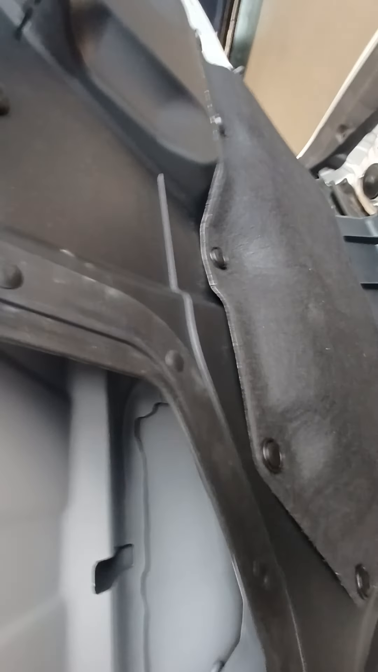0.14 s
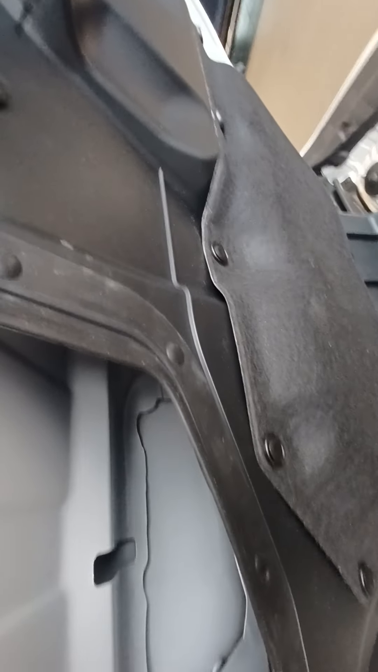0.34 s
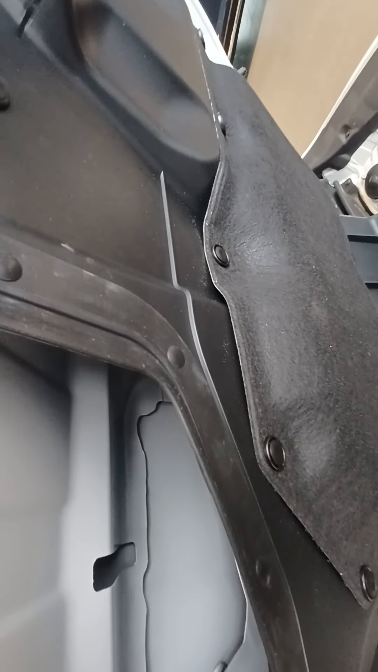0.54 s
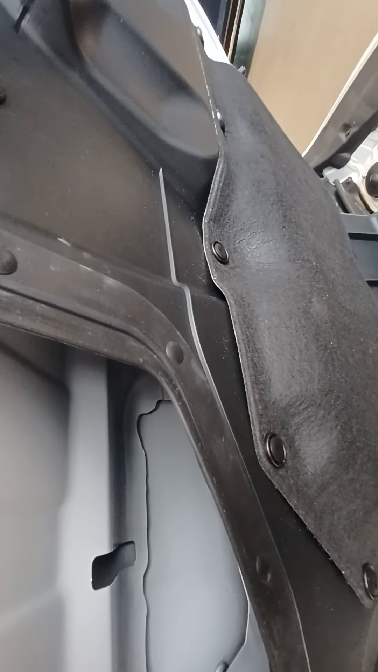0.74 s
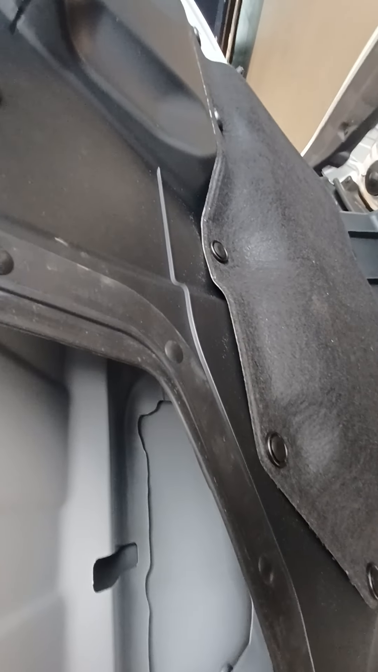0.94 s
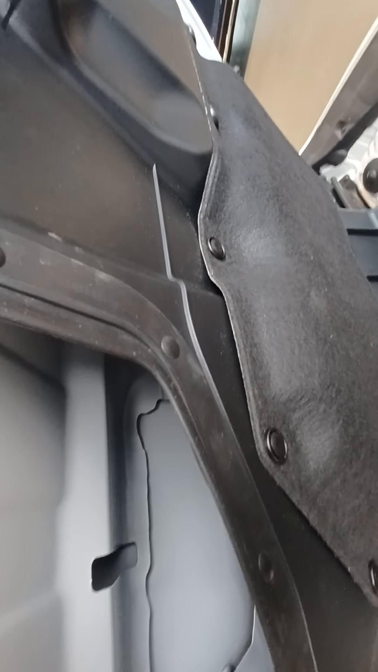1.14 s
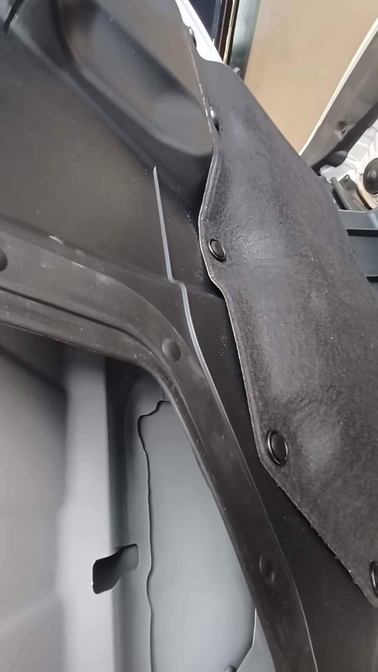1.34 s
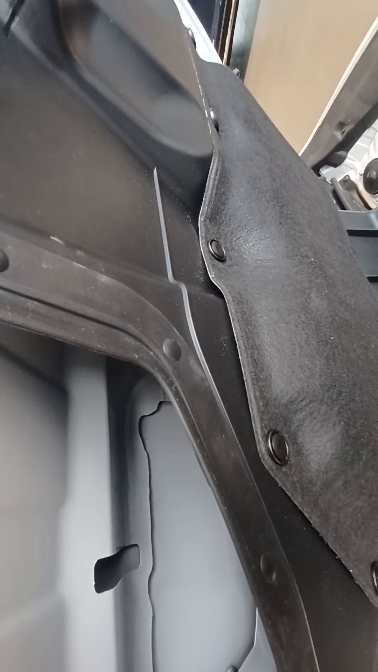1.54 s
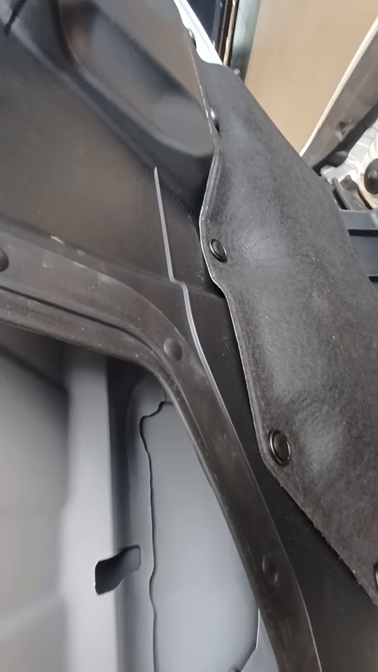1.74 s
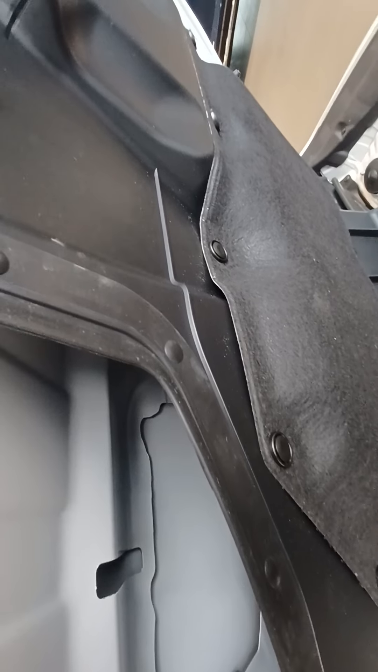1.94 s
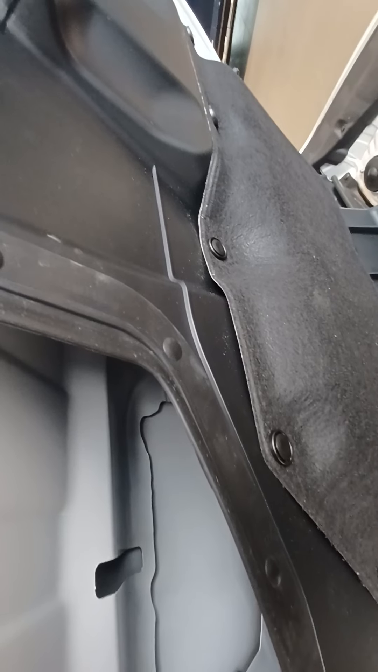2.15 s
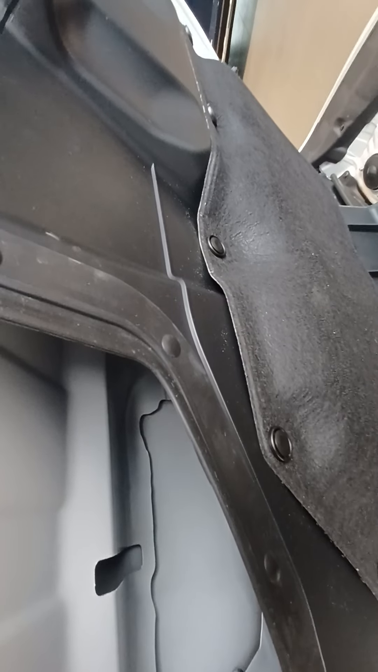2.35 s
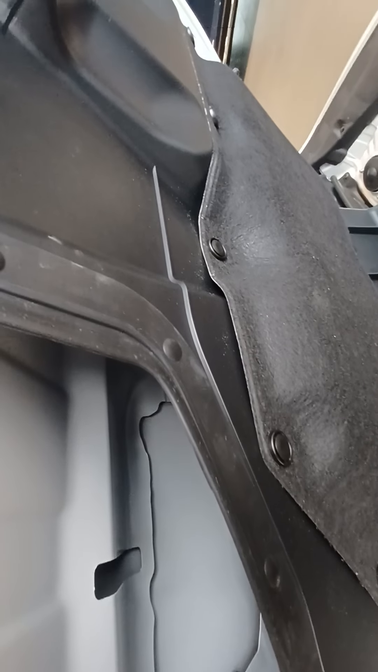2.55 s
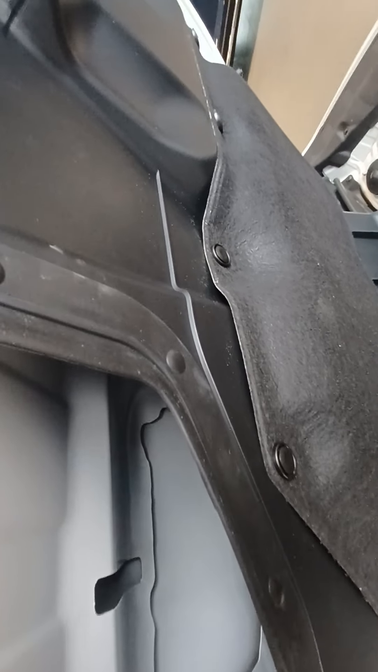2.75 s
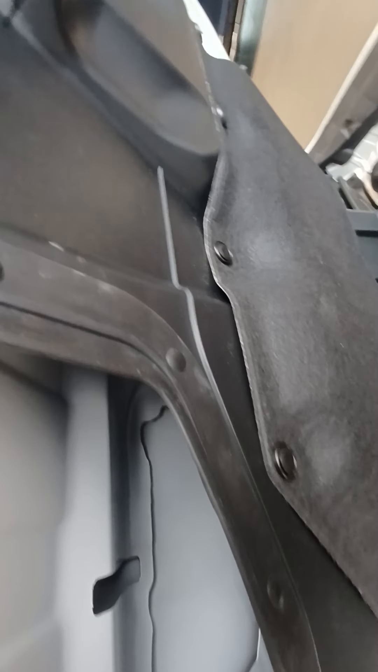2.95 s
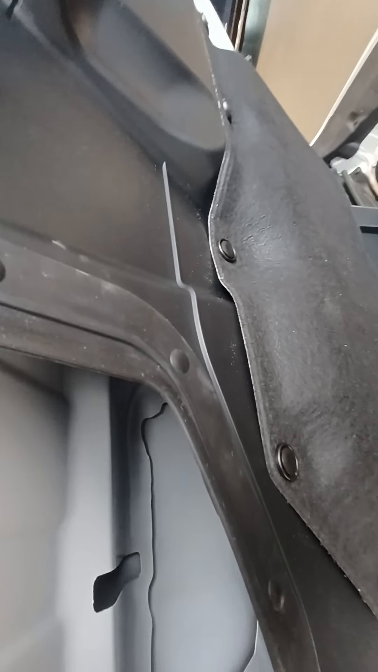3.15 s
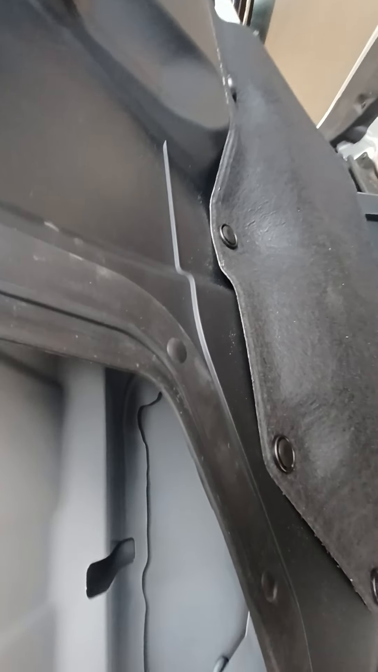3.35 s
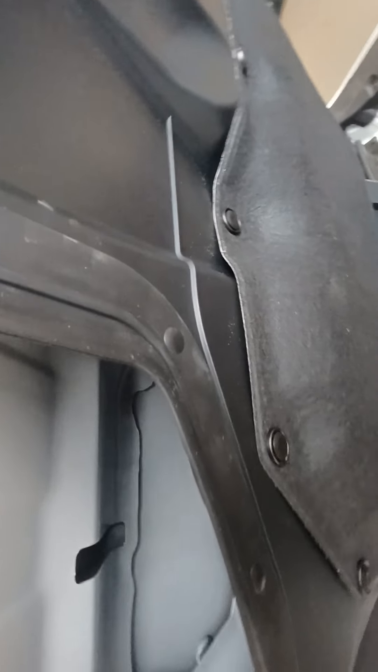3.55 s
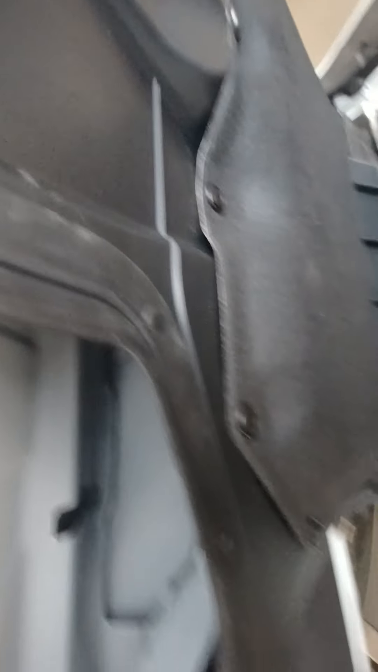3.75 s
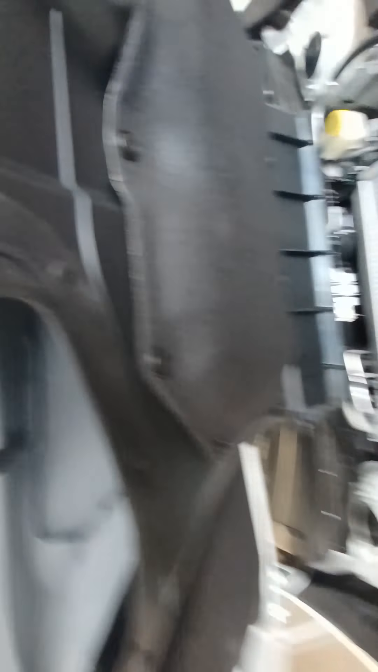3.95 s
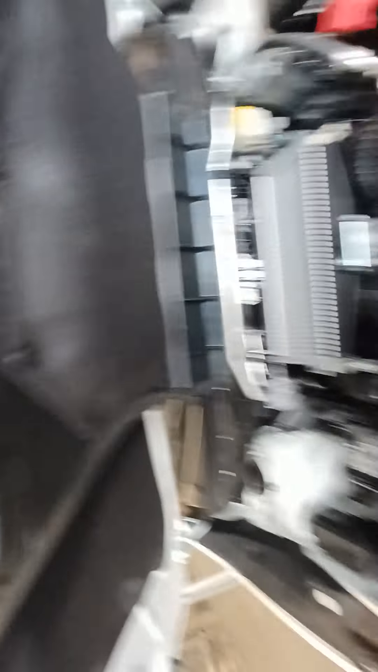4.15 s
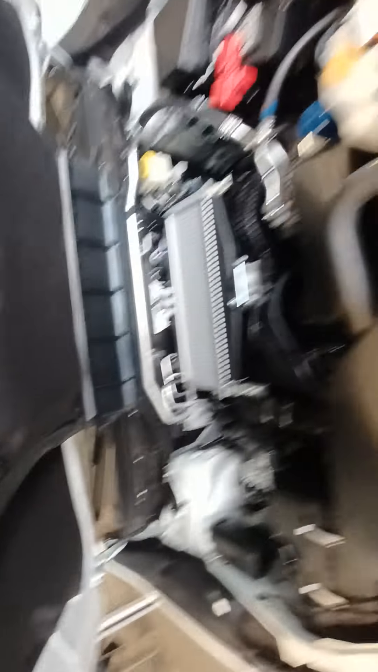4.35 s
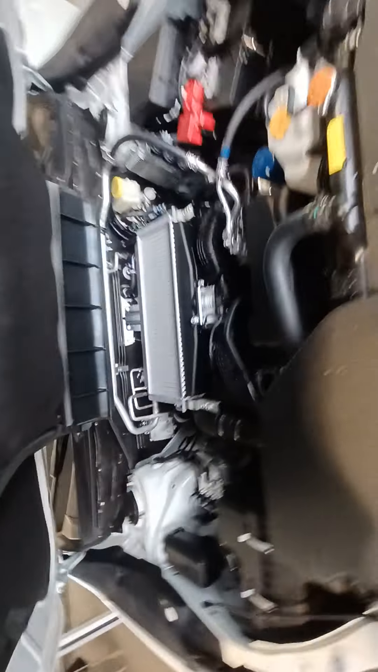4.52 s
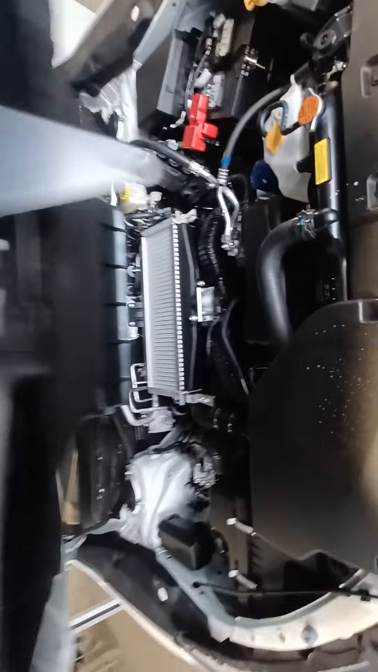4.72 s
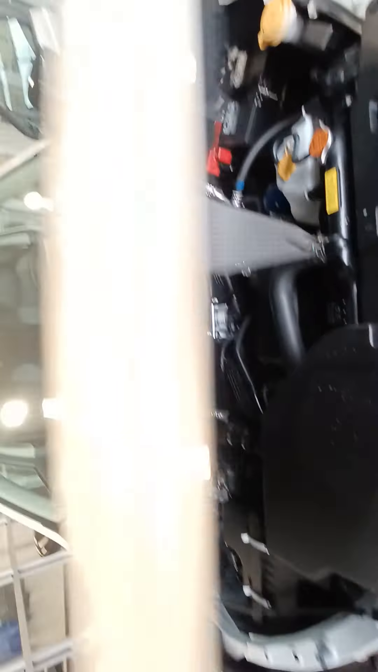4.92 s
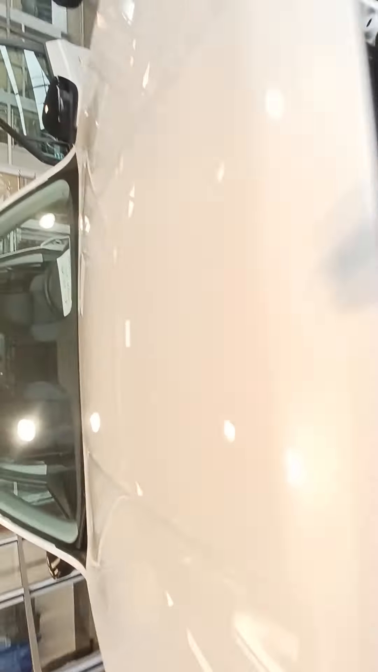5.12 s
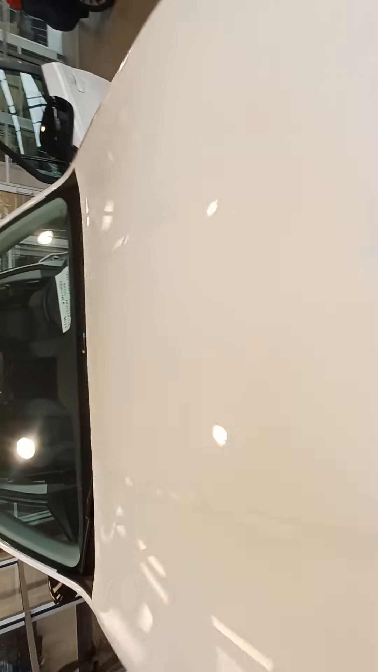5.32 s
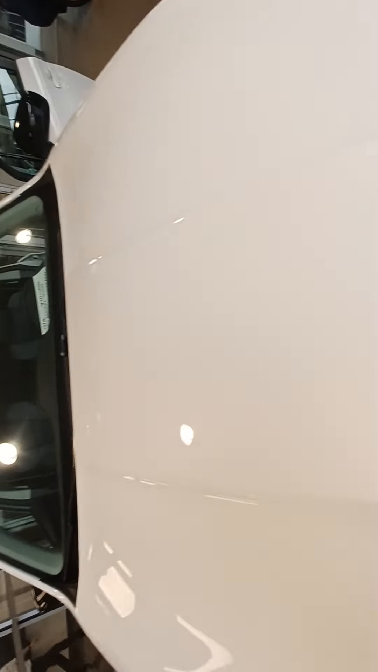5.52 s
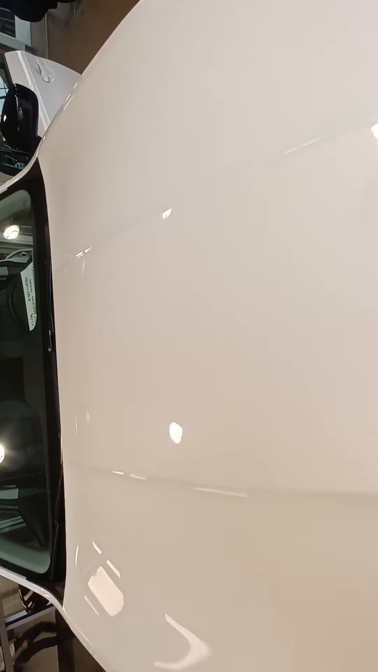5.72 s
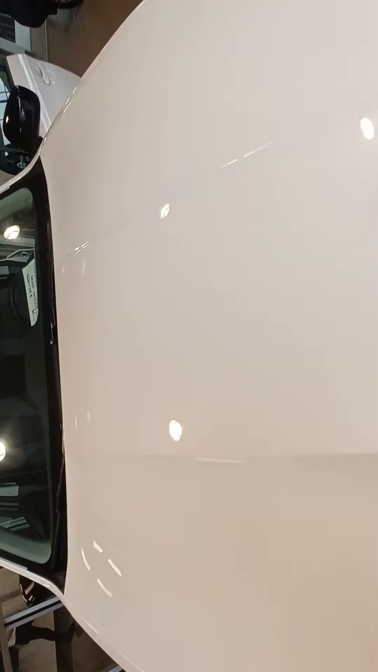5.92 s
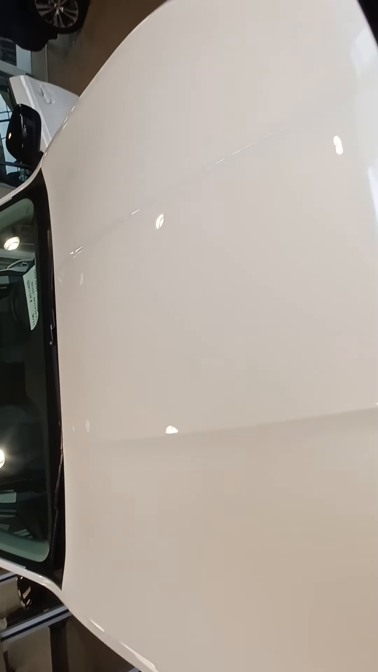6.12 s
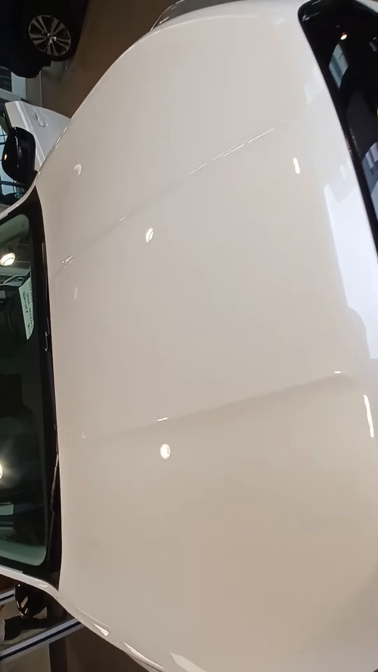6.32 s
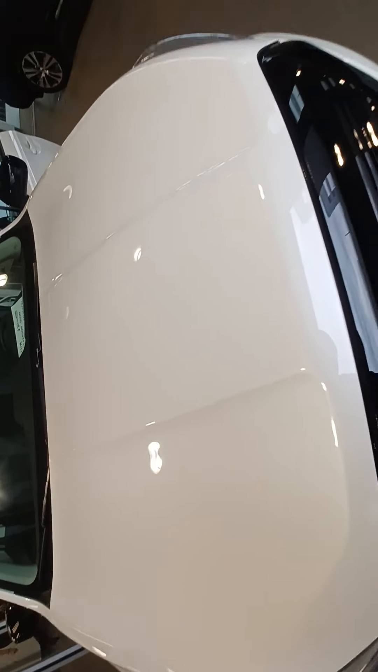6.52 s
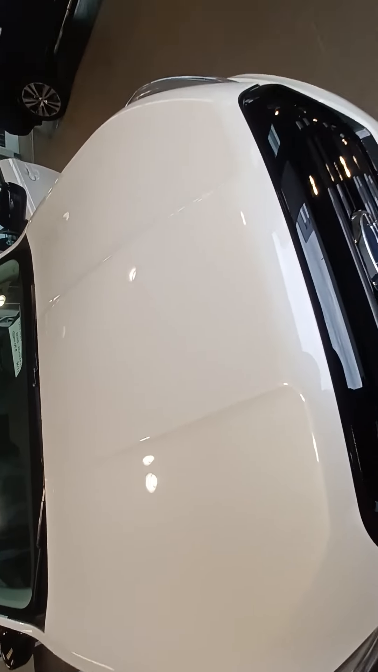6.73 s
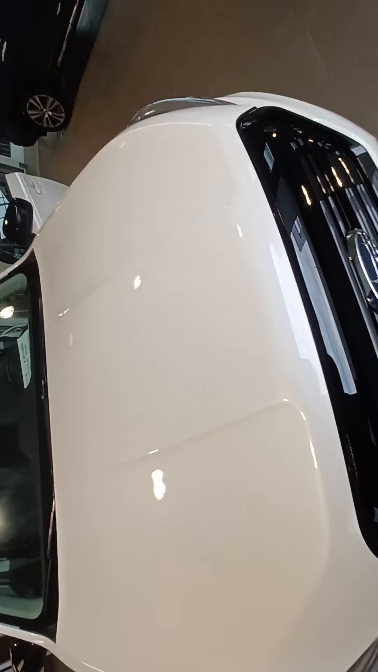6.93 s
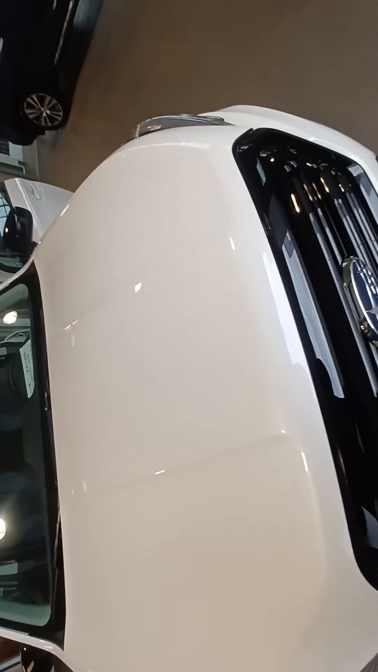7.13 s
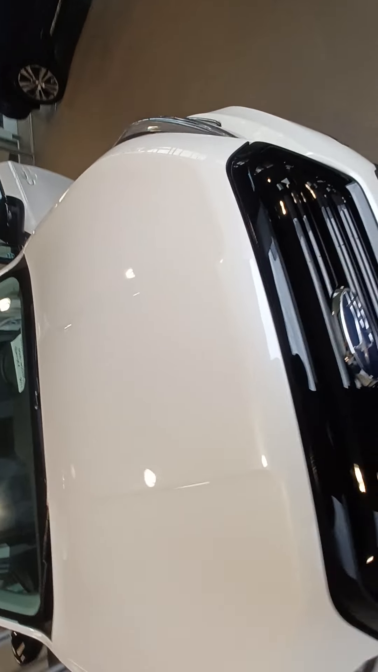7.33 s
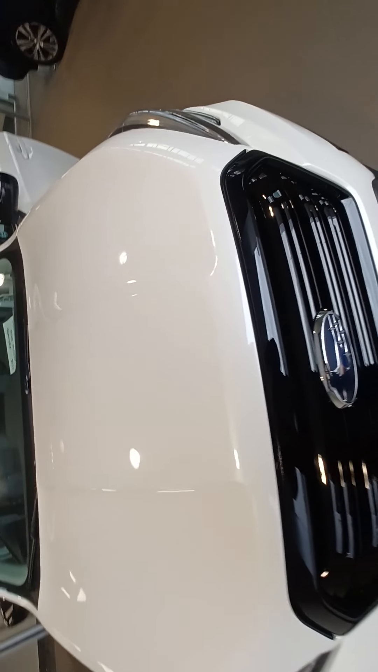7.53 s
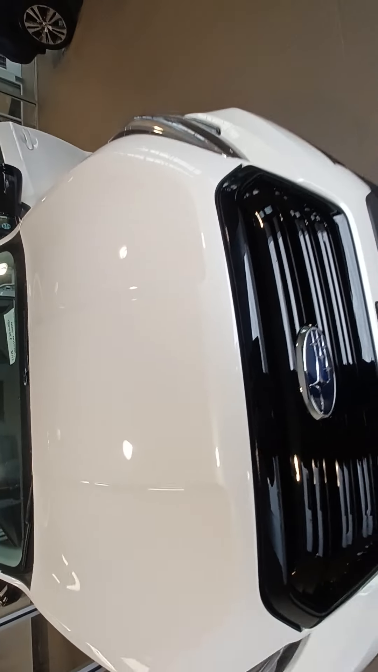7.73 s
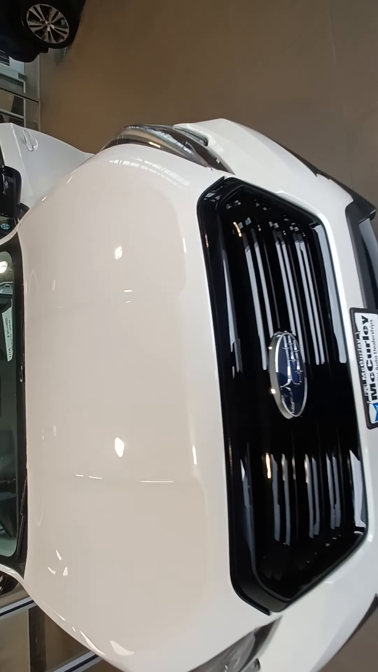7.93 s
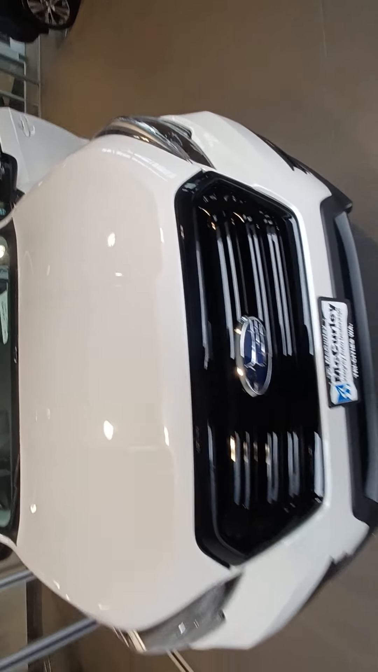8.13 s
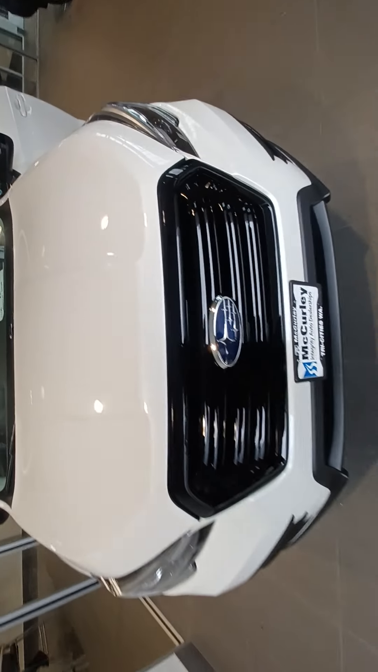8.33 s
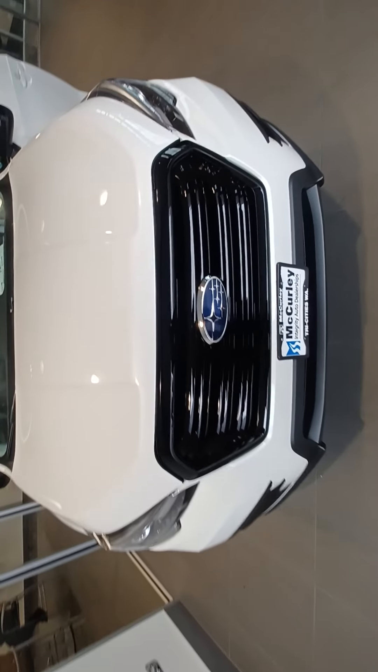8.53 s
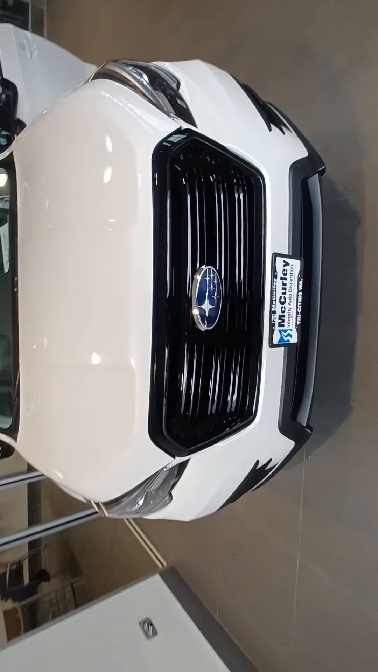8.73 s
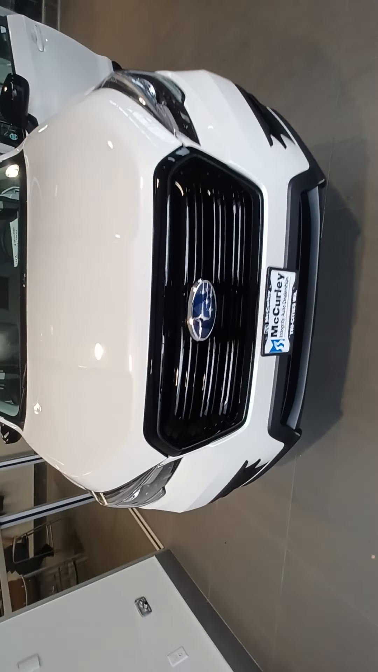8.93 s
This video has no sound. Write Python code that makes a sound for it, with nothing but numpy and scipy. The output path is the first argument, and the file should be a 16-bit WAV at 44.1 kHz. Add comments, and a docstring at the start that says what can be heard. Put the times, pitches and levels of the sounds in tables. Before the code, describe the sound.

Close stereo microphone inside a roomy, reverberant hall: duct rumble and airflow run throughout. First a dull hood clunk, a faint tick, a light rod tap and a sharper metal knock with a slight ping. Fabric brushes, a dull grip thump and soft footfalls come next. A loud hood slam with bouncing rattle fills the room, the background briefly sinking, then jacket rustles and small zip-like clicks.

```python
"""A car's hood is closed in a large showroom: decaying panel modes, noise rattle and noise snaps per blow.
The raised hood clunks, its prop rod is knocked into its clip, a hand grips the edge and the hood drops.
Hinge ticks, clicks and footfalls are short noise bursts; sleeves are noise gated by strokes and slips.
The hard room answers hood, rod, ticks and clothing catches with a diffuse noise tail.
Fan lines, duct rumble and rushing air run below, sinking for over a second from the slam on."""
import sys
import numpy as np
from scipy import signal
from scipy.fft import rfft, irfft, next_fast_len
from scipy.io import wavfile
from scipy.ndimage import map_coordinates

SR = 44100
rng = np.random.default_rng(int(sys.argv[2]) if len(sys.argv) > 2 else 0)


def unload_audio(sound):
    """Save the sound as a 16-bit wav file, at the path given as the first command line argument."""
    columns = np.transpose(np.atleast_2d(sound))
    # keep every value between -1 and 1, then stretch to whole-number steps
    steps = np.round(np.clip(columns, -1, 1) * 32767)
    wavfile.write(sys.argv[1], SR, steps.astype(np.int16))


N = 395577
TIME = np.arange(N) / SR
LIFE = SR // 2  # samples that one blow lasts
AGE = TIME[:LIFE]

# Hood falls on latch and bumpers and rebounds; levels before the trim in blows():
# (time [s], panel ring [dB], sheet rattle [dB], latch snap [dB], contact time [s], left-right [dB])
SLAM_BLOWS = [(5.4063, -33, -18, -8.5, 0.0046, 0.96), (5.4175, -22, -26.5, -8.5, 0.0068, 0.83),
              (5.4315, -8.5, -22, -21.5, 0.0017, 0), (5.4405, -17.5, -31.5, -27.5, 0.00027, 0.14),
              (5.4545, -25.5, -26, -28.5, .0005, 0), (5.4765, -13, -23, -32, 0.0024, 0)]
# Spectrum of sharp snaps and clicks: (frequency [Hz], relative density [dB per Hz])
SNAP_SPECTRUM = [(500, -9.5), (3000, -24.5), (6000, -16.5), (9000, -7), (11500, -4.5), (16000, -0.5)]


def amp(db):
    """Decibels to gain."""
    return 10 ** (np.asarray(db) / 20)


def unit(x):
    """Scale to rms 1."""
    return x / np.sqrt(np.mean(x ** 2) + 1e-20)


def along(points, hz):
    """Interpolate (Hz, value) points on a log frequency axis."""
    f, v = np.transpose(points)
    return np.interp(np.log(hz + 1), np.log(f + 1), v)


def wobble(knots_per_s):
    """Smooth random curve over the whole scene."""
    knots = rng.standard_normal(int(N * knots_per_s / SR) + 4)
    return map_coordinates(knots, [TIME * knots_per_s])


def shiver(count, knots):
    """Smooth random curves over the life of a blow."""
    return signal.resample(rng.standard_normal((count, knots)), LIFE, axis=1)


def filtered(x, response):
    """Multiply the spectrum of x by a response of frequency."""
    size = x.shape[-1]
    padded = next_fast_len(size + SR // 4)
    spectrum = rfft(x, padded) * response(np.fft.rfftfreq(padded, 1 / SR))
    return irfft(spectrum, padded)[..., :size]


def noise(spectrum, size):
    """Stereo noise of rms 1; the channels grow less alike from bass to treble."""
    # (frequency [Hz], left-right correlation)
    likeness = [(100, 1), (250, 0.79), (550, 0.56), (1000, 0), (16000, 0.032)]

    def mid_side_gains(hz):
        angle = np.arccos(np.clip(along(likeness, hz), -1, 1)) / 2
        return amp(along(spectrum, hz)) * [np.cos(angle), np.sin(angle)]

    mid, side = filtered(rng.standard_normal((2, size)), mid_side_gains)
    return unit(np.array([mid + side, mid - side]))


def pan(left_right_db):
    """Left and right gains of constant power."""
    gains = amp(np.array([left_right_db, -left_right_db]) / 2).reshape(2, -1)
    return gains / np.sqrt(np.mean(gains ** 2, axis=0))


def fade(t60_s, attack_s):
    """Quick rise, exponential decay."""
    return np.exp(-np.log(1000) * AGE / t60_s) * (1 - np.exp(-AGE / attack_s))


def add(track, start_s, x):
    """Mix x into the track in place, cut at the track's end."""
    part = track[:, round(start_s * SR):][:, :x.shape[-1]]
    part += x[..., :part.shape[-1]]


def hall(x):
    """The showroom's diffuse answer; each frequency dies at its own speed."""
    # (frequency [Hz], t60 [s])
    hall_t60 = [(80, 0.69), (300, 0.54), (1000, 0.57), (2700, 0.75), (6000, 0.53), (11000, 0.39),
                (16000, 0.28)]
    hz, t, cells = signal.stft(noise([(20, 0), (20000, 0)], SR), SR, nperseg=256)
    decay = amp(-60 * t / along(hall_t60, hz)[:, None])
    tail = signal.istft(cells * decay, SR, nperseg=256)[1][:, :SR]
    tail = tail * (1 - np.exp(-TIME[:SR] / 0.023))  # gradual onset
    tail = tail / np.linalg.norm(tail[0])
    return signal.fftconvolve(x.mean(axis=0)[None], tail, axes=1)[:, :N]


def ring(modes, contact_s):
    """Decaying modes after one blow; a long, soft contact weakens the high ones."""
    hz, db, t60_s = np.transpose(modes)[:, :, None]
    gain = amp(db + rng.normal(0, 1.5, hz.shape)) / np.sqrt(1 + (hz * contact_s) ** 4)
    # loose, flexing metal does not hold its pitch
    pitch_hz = hz * (1 + 0.018 * shiver(count=len(hz), knots=60))
    phase = 2 * np.pi * np.cumsum(pitch_hz, axis=1) / SR
    swing = np.sqrt(2) * gain / np.linalg.norm(gain) * fade(t60_s, attack_s=0.0021)
    # short waves reach the two ports out of step
    skew = np.minimum(hz / 1200, 1) * rng.standard_normal(hz.shape)
    left = (swing * np.sin(phase + skew)).sum(axis=0)
    right = (swing * np.sin(phase - skew)).sum(axis=0)
    return np.array([left, right])


def blows(rows, modes, colour, rattle_t60_s, snap_t60_s):
    """Each blow: a few strong modes, a chattering rattle of dense high ones and a sharp snap."""
    out = np.zeros((2, N))
    for start_s, ring_db, rattle_db, snap_db, contact_s, side_db in rows:
        chatter = unit(amp(3.7 * shiver(count=1, knots=200)))
        rattle = amp(rattle_db) * chatter * noise(colour, LIFE) * fade(rattle_t60_s, attack_s=0.0015)
        snap = amp(snap_db) * noise(SNAP_SPECTRUM, LIFE) * fade(snap_t60_s, attack_s=0.00027)
        tones = amp(ring_db) * ring(modes, contact_s)
        add(out, start_s, pan(side_db) * (tones + amp(2.0) * (rattle + snap)))
    return out


def lull():
    """Background gain: falls from the slam on, stays low and returns."""
    depth_db, fall_s, hold_s, return_s = 10, 0.53, 0.68, 0.45
    corners_s = SLAM_BLOWS[0][0] + np.cumsum([0, fall_s, hold_s, return_s])
    return amp(np.interp(TIME, corners_s, [0, -depth_db, -depth_db, 0]))


def ventilation():
    """Fans hum with wandering phase over duct rumble and rushing air; the air follows half the swell."""
    # slow swell as the microphone moves about, before trim and lull: (time [s], level [dB])
    swell = [(0, -39), (1.0, -43), (1.8, -40), (3.0, -44), (3.9, -39.5), (5.3, -39), (7.5, -40),
             (8.97, -36)]
    # fan lines: (frequency [Hz], level re swell [dB])
    fan_lines = [(73, -5), (146, -11.5), (220, -7)]
    # duct rumble, rushing air: (frequency [Hz], relative density [dB per Hz])
    rumble_spectrum = [(20, -38.5), (35, -19.5), (50, -13.5), (65, -9.5), (90, 0.5), (130, 3), (180, -5),
                       (240, -4), (310, -14.5), (500, -21), (1200, -48.5)]
    air_spectrum = [(100, -13), (300, 4.5), (450, -2), (700, -1), (1000, -2), (1500, -8), (2400, -14),
                    (3200, -21), (6500, -23.5), (16000, -41)]
    mean_air_db, air_follows = -52.5, 0.5  # before the lull; share of the swell

    swell_db = np.interp(TIME, *np.transpose(swell))
    air_db = mean_air_db + air_follows * (swell_db - swell_db.mean())
    hum = np.zeros(N)
    for hz, db in fan_lines:
        level = amp(db + 1.5 * wobble(4)) * np.sqrt(2)
        hum += level * np.sin(2 * np.pi * hz * TIME + 0.5 * wobble(4))
    low = amp(swell_db) * (amp(-1.5) * noise(rumble_spectrum, N) + hum) * pan(-1.3)
    air = amp(air_db) * noise(air_spectrum, N) * pan(-2.1)
    return lull() * (low + air)


def sliding():
    """Stereo gains of swish and scuff: every stroke rises, holds and dies away at the same rates."""
    # sleeve strokes: (time [s], hold [s], swish [dB], scuff [dB], left-right [dB])
    strokes = [(.45, .7, -58, -67.5, -10), (1.263, 0.48, -65.5, -65.5, -18), (2.569, 0.42, -56.5, -63, -9),
               (2.77, .05, -43.5, -52.5, -3), (3.221, 0.033, -43.5, -60, -1),
               (3.45, 0.46, -57.5, -66.5, -9), (3.83, 1.05, -54, -63.5, -9.5),
               (4.935, 0.82, -58.5, -69.5, -24), (5.916, 0.11, -54, -68, -7),
               (6.135, 0.0088, -46.5, -57.5, -1), (6.48, .03, -61.5, -72.5, -8),
               (7.024, 0.11, -57, -60.5, 2.5), (7.28, 0.24, -51, -58.5, -3), (7.55, .075, -36, -46, 1),
               (8.026, 0.27, -52.5, -55.5, -3), (8.207, .14, -36, -49, -2.5), (8.824, 0.14, -54, -63, 0)]
    rise_db_per_s, fall_db_per_s = 241.5, 142
    resting_swish_db, resting_scuff_db = -67, -80.5  # fabric never lies quite still

    swish_power = np.full((2, N), amp(resting_swish_db) ** 2)
    scuff_power = np.full((2, N), amp(resting_scuff_db) ** 2)
    for start_s, hold_s, swish_db, scuff_db, side_db in strokes:
        down_db = np.maximum(rise_db_per_s * (start_s - TIME), fall_db_per_s * (TIME - start_s - hold_s))
        near = down_db < 60
        stroke = pan(side_db) * amp(-np.maximum(down_db[near], 0))
        swish_power[:, near] += (amp(swish_db) * stroke) ** 2
        scuff_power[:, near] += (amp(scuff_db) * stroke) ** 2
    return np.sqrt(swish_power), np.sqrt(scuff_power)


def clothes():
    """Fabric slides in tiny uneven slips and crackles, catches with short chirps; cuffs and zip click."""
    # cuffs and zip: (time [s], level [dB], left-right [dB])
    clicks = [(.3015, -32, -9), (1.8202, -34.5, -10), (2.8134, -34, -1), (6.4773, -41.5, 4),
              (7.2595, -29.5, 0.5), (7.3543, -30, 11.5), (7.4985, -26, 6), (7.576, -22.5, 16),
              (8.1824, -22.5, -1), (8.2029, -19.5, -2), (8.308, -16, -3.5), (8.8384, -35, -1.5)]
    # fabric catches: (time [s], level [dB], pitch [Hz], t60 [s])
    chirps = [(1.329, -56.5, 4660, 0.7), (2.578, -34, 3150, 0.0058), (2.813, -28, 1180, 0.0091),
              (3.831, -42.5, 2920, 0.052), (6.129, -42, 2720, 0.017), (6.1292, -37, 4750, 0.012),
              (7.475, -39, 3100, 0.0089), (7.701, -43, 4000, 0.17), (8.056, -38, 2350, .053),
              (8.22, -43.5, 4430, 0.066), (8.318, -32.5, 2150, 0.077), (8.933, -40.5, 1950, .17)]
    # scuff, swish: (frequency [Hz], relative density [dB per Hz])
    scuff_spectrum = [(500, -33), (1500, 5), (2500, 4), (4600, 2.5), (6300, 8), (9000, -23), (16000, -4)]
    swish_spectrum = [(3000, -34.5), (7000, -7), (10000, -5), (12500, -0.5), (16000, -0.5)]
    fibres_per_s, fibre_t60_s, crackle_depth = 37, 0.0085, 1.7

    swish, scuff = sliding()
    # single fibres let go at random
    releases = (rng.random(N) < fibres_per_s / SR) * rng.exponential(size=N)
    crackle = signal.fftconvolve(releases, fade(fibre_t60_s, attack_s=0.0001))[:N]
    # brisk movement crackles most; slow sliding is a soft hiss
    briskness = np.sqrt(swish.mean(axis=0) / swish.max())
    unevenness = amp(1.9 * wobble(45) + 1.6 * wobble(600))
    slips = unit(unevenness * (1 + crackle_depth * briskness * crackle))
    rustle = slips * (scuff * noise(scuff_spectrum, N) + swish * noise(swish_spectrum, N))

    catches = np.zeros((2, N))
    for start_s, db, side_db in clicks:
        click = noise(SNAP_SPECTRUM, LIFE) * fade(0.02, attack_s=0.00021)
        add(catches, start_s, amp(db) * pan(side_db) * click)
    for start_s, db, hz, t60_s in chirps:
        colour = [(hz / 4, -22), (hz * 0.7, -8), (hz, 0), (hz * 1.35, -8), (hz * 4, -22)]
        add(catches, start_s, amp(db) * noise(colour, LIFE) * fade(t60_s, attack_s=t60_s / 20))
    return rustle + catches + amp(-5.0) * hall(catches)


def hood():
    """Held in the hand the hood is damped and quiet in the room; dropped, it rings freely and fills it."""
    # lifted off its prop, then gripped at its plastic-lined edge; levels before trims:
    # (time [s], ring [dB], rattle [dB], snap [dB], contact time [s], left-right [dB])
    lift_blows = [(.1752, -19, -24, -27, 0.00077, -6.5), (.1775, -9, -29, -28, 0.002, -12.5),
                  (.184, -21, -20.5, -26, .0002, -6), (.1965, -16, -38.5, -41.5, 0.0058, -8.5)]
    grip_blows = [(3.8847, -18.5, -30, -24.5, .0002, -2), (3.9192, -21, -42.5, -48.5, 0.0032, -1)]
    # modes of raised hood, edge liner, closed hood: (frequency [Hz], relative level [dB], t60 [s])
    raised_modes = [(90.4, 2, 0.15), (165, 2, 0.088), (230, 5.5, 0.045), (293, 1.5, 0.06),
                    (374, -5.5, 0.12), (562, -.5, 0.13), (712, -5.5, 0.16), (851, -8.5, 0.18),
                    (1830, -11, 0.12), (2290, -11, 0.16), (3570, -17, 0.09)]
    liner_modes = [(275, -7, 0.074), (475, -3, 0.016), (565, 4, 0.022), (700, 2.5, 0.022), (855, -7, 0.03),
                   (1530, -13, 0.066)]
    closed_modes = [(82, -0.5, 0.17), (120.4, 2.5, 0.15), (141, 11, 0.068), (159.4, -4, 0.34),
                    (231.4, -5.5, 0.29), (269, 0.5, 0.2), (314, -2, 0.17), (330, -3.5, 0.091),
                    (396, -8, 0.23), (445, -2, 0.18), (526.5, -8.5, .2), (541, -0.5, 0.21),
                    (686, -9.5, 0.24), (750, -21, 0.48), (890, -4.5, 0.3), (953, -10, 0.51),
                    (1030, -24, .3), (1290, -22, 0.295), (1400, -6, 0.287), (1506, -13, 0.37)]
    # rattle of raised hood, liner, closed hood: (frequency [Hz], relative density [dB per Hz])
    loose_spectrum = [(100, -29), (250, 18.5), (550, 12.5), (850, 7), (1300, -4), (2200, -3), (2900, -5.5),
                      (4200, -0.5), (6300, -3), (9000, -11), (16000, -32)]
    plastic_spectrum = [(200, 3), (580, 12.5), (800, 4), (1100, -2.5), (1700, -6), (2600, -8.5),
                        (4000, -17), (7000, -23), (16000, -29)]
    sheet_spectrum = [(100, -13), (250, 18), (550, 2.5), (900, 5), (1600, 1), (3000, -6), (4500, -4),
                      (6300, -3.5), (9000, -20), (16000, -27)]

    lifted = blows(lift_blows, raised_modes, loose_spectrum, rattle_t60_s=0.11, snap_t60_s=0.065)
    gripped = blows(grip_blows, liner_modes, plastic_spectrum, rattle_t60_s=0.14, snap_t60_s=0.023)
    held = lifted + gripped
    dropped = blows(SLAM_BLOWS, closed_modes, sheet_spectrum, rattle_t60_s=0.24, snap_t60_s=0.051)
    # the panel throws more treble than bass into the room: (Hz, dB)
    room_send = [(100, -8.5), (500, -7), (1300, -5.0), (6000, -3), (12000, -1)]
    radiated = filtered(dropped, lambda hz: amp(along(room_send, hz)))
    return amp(2.5) * held + amp(-17) * hall(held) + dropped + hall(radiated)


def hinges():
    """Single dry ticks as the hood moves."""
    # (time [s], level [dB])
    ticks = [(1.1782, -29), (4.507, -25)]
    # (frequency [Hz], relative density [dB per Hz])
    tick_spectrum = [(200, -27), (550, -15), (850, 17), (1300, 6.5), (1850, 10.5), (2300, -24), (6000, -21),
                     (12000, -33.5)]
    out = np.zeros((2, N))
    for start_s, db in ticks:
        add(out, start_s, amp(db) * noise(tick_spectrum, LIFE) * fade(0.0088, attack_s=0.00018))
    return out + amp(-17) * hall(out)


def prop_rod():
    # levels before the trim in blows(): (time [s], bracket ring [dB], steel rattle [dB], snap [dB],
    # contact time [s], left-right [dB])
    rod_knocks = [(1.726, -40.5, -34.5, -35, 0.00028, -5.5), (1.734, -23, -33.5, -57, 0.0092, -1),
                  (1.7475, -18.5, -59.5, -67.5, 0.01, -3), (2.1075, -18.5, -12, -19.5, 0.00022, -4),
                  (2.1152, -7.5, -22.5, -32.5, 0.00062, -5), (2.1375, -15.5, -29.5, -55, 0.0013, 13),
                  (2.1715, -13, -41, -55, 0.0021, -1.5)]
    # (time [s], level [dB])
    rod_pings = [(1.726, -39.5), (2.108, -32)]
    # bracket, rod: (frequency [Hz], relative level [dB], t60 [s])
    bracket_modes = [(222, -15, 0.24), (252.7, 0, 0.13), (309.3, 1, 0.095), (415, -15.5, 0.18),
                     (483, -16.5, 0.16), (563, -11, 0.035), (642, -2.5, 0.068), (786, -13.5, 0.074),
                     (870, -8.5, 0.16), (1023, -17.5, 0.12), (1360, -10, 0.11), (1770, -25, .15),
                     (1870, -13, 0.2), (2460, -16, 0.16)]
    rod_modes = [(2220, -2, 0.2), (3370, -5.5, 0.14), (3640, -3.5, 0.16), (5000, -17, .06),
                 (5230, -14, .04), (5600, -6.5, .05), (6100, -22, .08)]
    # steel rattle: (frequency [Hz], relative density [dB per Hz])
    clink_spectrum = [(200, -28.5), (600, 3.5), (1000, 9), (1400, 1), (2000, 4), (3200, -10), (4800, -0.5),
                      (6200, 4.5), (8500, -9.5), (16000, -25)]
    out = blows(rod_knocks, bracket_modes, clink_spectrum, rattle_t60_s=0.063, snap_t60_s=0.062)
    for start_s, db in rod_pings:
        add(out, start_s, amp(db) * pan(-4) * ring(rod_modes, contact_s=0))
    return out + amp(-15.0) * hall(out)


def steps():
    """Soft soles thud on a hard floor."""
    # (time [s], level [dB])
    footfalls = [(4.151, -27.5), (4.22, -35), (4.311, -37.5), (7.565, -32.5)]
    # (frequency [Hz], relative density [dB per Hz])
    thud_spectrum = [(50, -17), (130, 5.5), (280, 2), (500, -6), (1000, -17), (2500, -30), (8000, -41)]
    out = np.zeros((2, N))
    for start_s, db in footfalls:
        add(out, start_s, amp(db) * noise(thud_spectrum, LIFE) * fade(0.45, attack_s=0.025))
    return out


def scene():
    """All sources at the two microphone ports."""
    return ventilation() + clothes() + hood() + hinges() + prop_rod() + steps()


def record(dry):
    """The microphone sheds deep bass, has a hollow near 8 kHz and stops at its band limit."""
    # (frequency [Hz], gain [dB])
    mic_response = [(6700, 2), (7500, -11.5), (8700, -8), (10000, -2), (12000, 4.5), (14500, 0.5),
                    (16000, -19.5)]
    band_limit_hz = 16000
    highpass = signal.butter(4, 50, "high", fs=SR, output="sos")
    coloured = signal.sosfilt(highpass, dry)
    return filtered(coloured, lambda hz: amp(along(mic_response, hz)) * (hz < band_limit_hz))


dry = scene()
out = record(dry)
unload_audio(out)
```